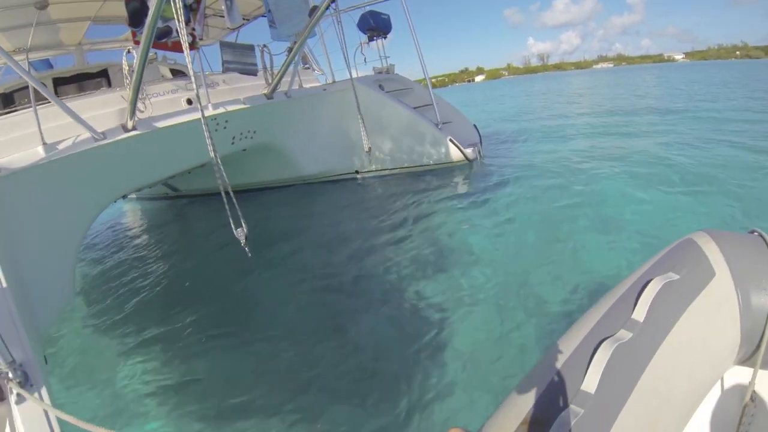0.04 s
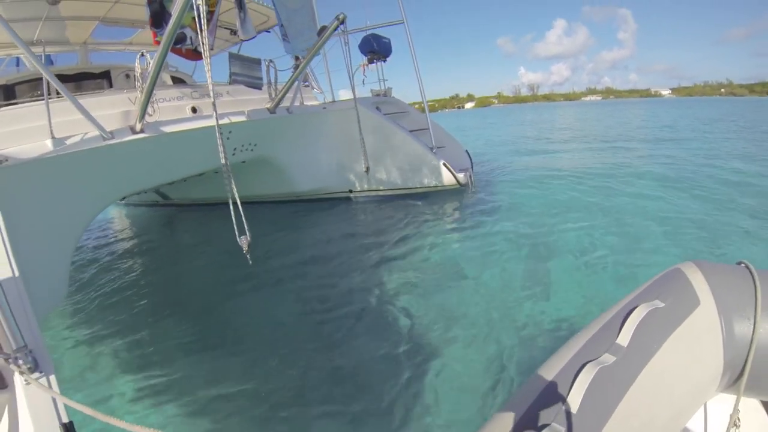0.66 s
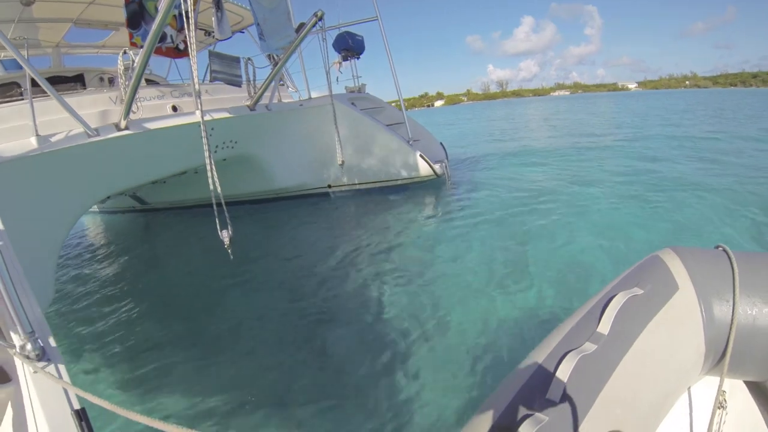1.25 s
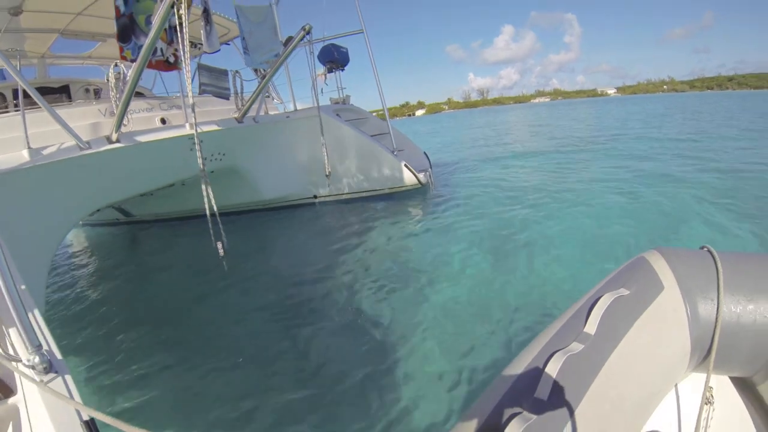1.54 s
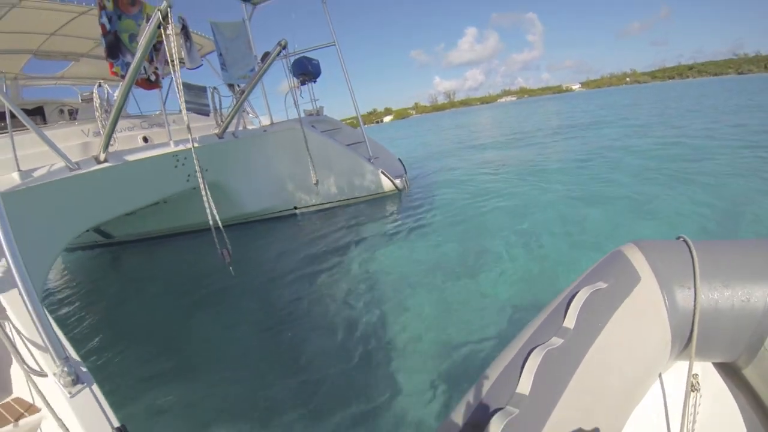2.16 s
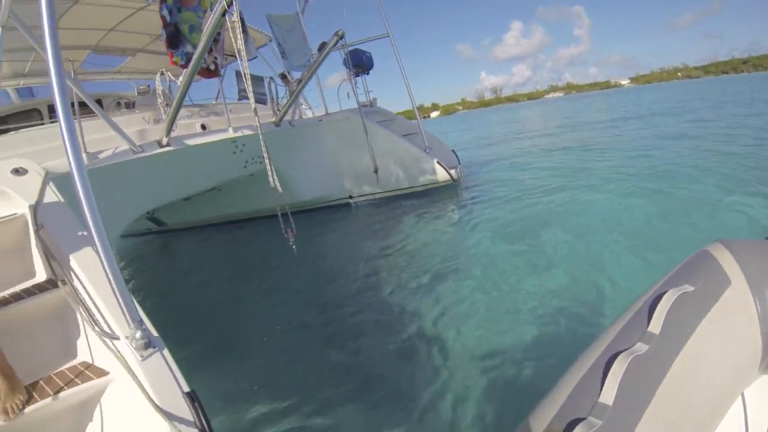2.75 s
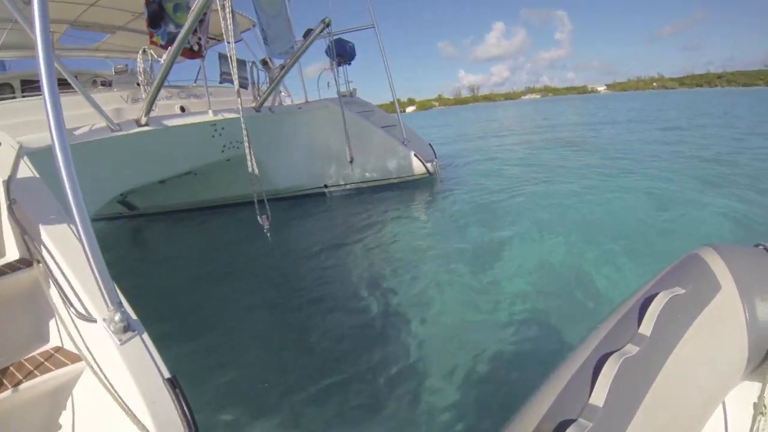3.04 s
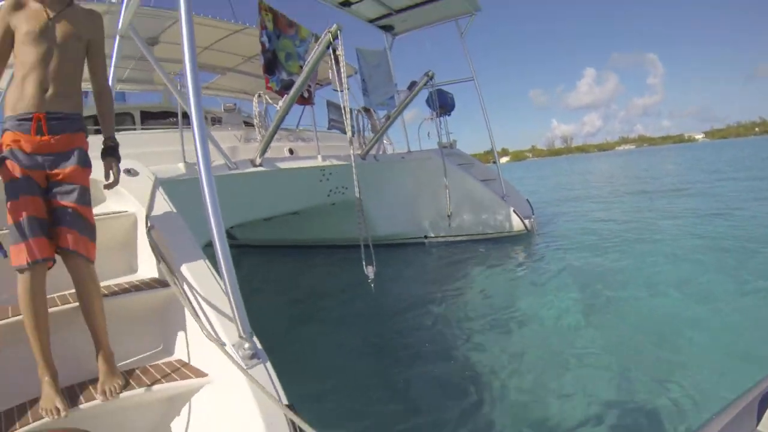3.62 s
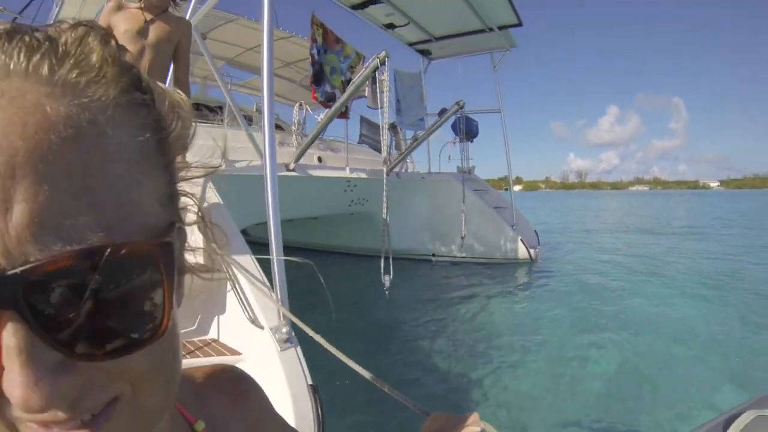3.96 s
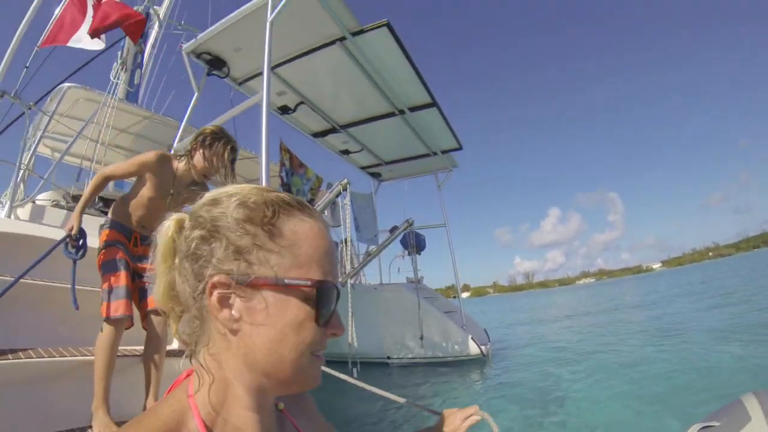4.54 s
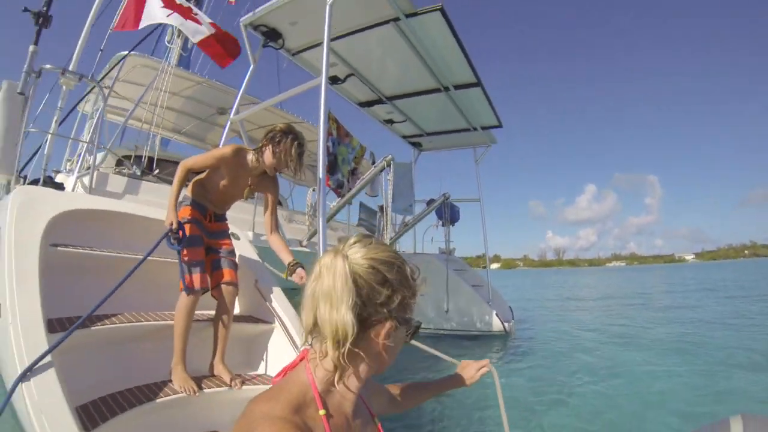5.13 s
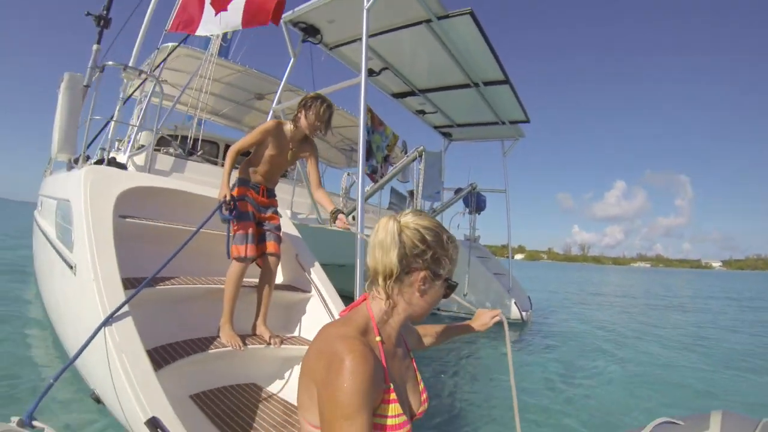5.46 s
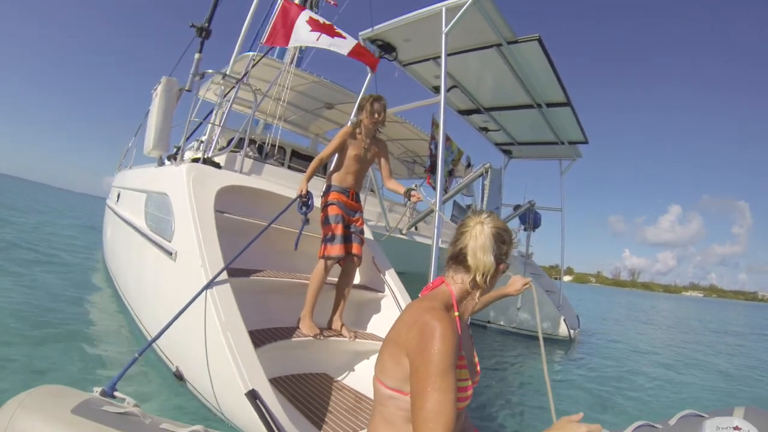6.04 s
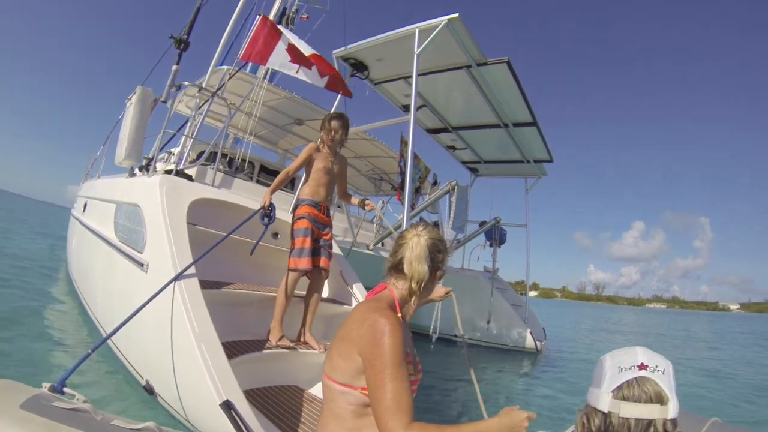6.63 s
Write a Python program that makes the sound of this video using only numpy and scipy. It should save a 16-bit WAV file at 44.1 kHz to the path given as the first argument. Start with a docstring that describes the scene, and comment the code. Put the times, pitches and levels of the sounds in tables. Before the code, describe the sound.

Muffled ripples and low wind rumble around an inflatable dinghy, then heavy knocks and a short scrape as it comes alongside a larger boat.

```python
"""Dinghy at a yacht's stern

An inflatable dinghy lies astern in light wind, heard from a microphone inside a hand-held waterproof
camera housing. Ripples plip, gurgle and boom under the hulls. The housing sways, then is bumped and
scraped as the dinghy comes alongside; its shell muffles everything and rings with its own few modes."""
import sys
import numpy as np
from scipy import signal
from scipy.fft import rfft, irfft
from scipy.io import wavfile
from scipy.ndimage import uniform_filter1d

SR = 44100
rng = np.random.default_rng(int(sys.argv[2]) if len(sys.argv) > 2 else 0)


def materialize(psi):
    """Save the field psi as 16-bit PCM at rate SR to the path in sys.argv[1].

    A 1-D psi becomes a single channel; in a 2-D psi each row is a channel.
    """
    bounded = np.clip(np.atleast_2d(psi).T, -1, 1)
    quanta = np.round(bounded * 32767).astype(np.int16)
    wavfile.write(sys.argv[1], SR, quanta)


N = 303849
T = np.arange(N) / SR


def from_db(db):
    """Decibels to gain."""
    return 10 ** (np.asarray(db) / 20)


def rms_one(x):
    """Scale to rms 1."""
    return x / np.sqrt(np.mean(x ** 2) + 1e-20)


def level(rows):
    """Gain at every sample from (s, dB) rows."""
    return from_db(np.interp(T, *np.transpose(rows)))


def peak(s, rise_db_per_s, fall_db_per_s):
    """Gain that climbs to 1 at time s and falls away again."""
    return from_db(-np.maximum(rise_db_per_s * (s - T), fall_db_per_s * (T - s)))


def add(out, s, sound):
    """Mix a sound in at time s."""
    at = max(round(s * SR), 0)
    out[at:at + len(sound)] += sound[:N - at]


def butter(x, hz, kind, order=2):
    """Causal Butterworth filter."""
    return signal.sosfilt(signal.butter(order, hz, kind, fs=SR, output="sos"), x)


def coloured(x, colour):
    """Shape a signal with a (Hz, dB) curve; rms 1."""
    hz, db = np.transpose(colour)
    bins = np.arange(N // 2 + 1) * SR / N + 1e-3
    gain = from_db(np.interp(np.log(bins), np.log(hz), db))
    return rms_one(irfft(rfft(x) * gain, N))


def drift(per_s):
    """Slow random wander; rms 1."""
    knots = rng.standard_normal(4000)
    return rms_one(np.interp(T * per_s, np.arange(len(knots)), knots))


def resonance(x, hz, width_hz):
    """Two-pole resonance with gain 1 on top."""
    r = np.exp(-np.pi * width_hz / SR)
    feedback = [1, -2 * r * np.cos(2 * np.pi * hz / SR), r * r]
    return signal.lfilter(np.array([1, 0, -1]) * (1 - r * r) / 2, feedback, x + 1e-18)


def noise_tone(hz, width_hz):
    """An unsteady tone: noise passed twice through one resonance; rms 1."""
    band = resonance(rng.standard_normal(N), hz, width_hz)
    return rms_one(resonance(band, hz, width_hz))


def grains(per_s, spread_db):
    """Random clicks of uneven size; rms 1."""
    sizes = from_db(spread_db * np.minimum(rng.exponential(1, N), 4))
    signs = rng.choice([-1, 1], N)
    return rms_one(sizes * signs * (rng.random(N) < per_s / SR))


def swings(rows, steepness, sag):
    """Soft pushes: each swells and dies within a few cycles, its pitch sagging as the load comes off."""
    out, t = np.zeros(N), T[:SR // 2]
    for s, db, hz, swell_s in rows:
        age = t / swell_s
        pitch = hz * (1 - sag * np.tanh(age - 1))
        envelope = (age * np.exp(1 - age)) ** steepness
        add(out, s, from_db(db) * envelope * np.sin(2 * np.pi * np.cumsum(pitch) / SR))
    return out


# Ripples all around the boats, livelier near the stern. Each row: time in seconds, overall gain in dB.
RIPPLE_LEVELS = [(0, -59.3), (1.4, -58.3), (3.2, -61), (3.7, -55.5), (5.1, -54), (6.15, -51.8),
                 (6.89, -53.8)]
# The water as heard from inside the housing. Each row: frequency in Hz, relative level in dB.
WATER_SPECTRUM = [(450, -17), (700, -6), (930, -16), (1080, -7), (1270, 2.5), (1420, -3.5), (1600, -2.5),
                  (1800, -16), (2200, -13), (2500, -16.5), (2950, -13), (3500, -25), (4800, -25.5),
                  (8000, -42.5)]


def ripples(fizz_db=-4.5, wash_db=-5.0, ring_cycles=14):
    """A wash of wavelets with tiny bubbles in it, each ringing briefly at a pitch of its own."""
    wash = rng.standard_normal(N) * from_db(2.8 * drift(12))
    wash = from_db(wash_db) * coloured(wash, WATER_SPECTRUM)
    pitches = np.geomspace(1000, 6500, num=22)
    bubbles = sum(resonance(grains(per_s=30, spread_db=3.0), hz, hz / ring_cycles) for hz in pitches)
    flicker = from_db(4 * np.tanh(drift(22)))
    fizz = from_db(fizz_db) * coloured(bubbles * flicker, WATER_SPECTRUM)
    return level(RIPPLE_LEVELS) * (wash + fizz)


def gurgles(gurgle_db=-65, per_s=45):
    """Larger pockets of air gulp under the stern, the big ones loudest."""
    pitches = np.geomspace(205, 600, num=5)
    pockets = sum(resonance(grains(per_s, spread_db=2.0), hz, hz / 7) / hz ** 0.7 for hz in pitches)
    return from_db(gurgle_db) * rms_one(pockets) * from_db(2.0 * drift(5.4))


# Water swashing down between the hulls. Each row: time in seconds, level of the upper mode in dB.
SWASH_LEVELS = [(0, -55.5), (3.8, -53.5), (5.0, -54), (5.6, -60)]


def swash(hollow_hz=104, deep_hz=62, deep_db=-2.5, width_hz=65, surge_db=2.0):
    """Moving water keeps the air under the hulls droning in two broad modes, surging wave by wave."""
    drone = noise_tone(hollow_hz, width_hz) + from_db(deep_db) * noise_tone(deep_hz, width_hz)
    surge = rms_one(from_db(surge_db * drift(7)))
    return level(SWASH_LEVELS) * surge * drone


# Larger wavelets slapping in under the hollow hulls.
# Each row: start in seconds, peak level in dB, swell time in seconds.
HULL_SLAPS = [(0.0, -34.5, 0.029), (.075, -40.5, .028), (.425, -36, .024), (.86, -38, .02),
              (.91, -37, .025), (1.365, -39.5, 0.032), (1.625, -34, 0.036), (1.842, -29.5, .024),
              (2.32, -40, 0.027), (2.915, -35, .022), (3.0, -36, .03), (3.228, -32, 0.018),
              (3.535, -34.5, .02), (3.692, -23.5, .016), (3.735, -27, .018), (3.85, -27, .018),
              (4.01, -30.5, .01)]


def booms(hollow_hz=103, typical_db=-35, drop_hz_per_db=1.0):
    """Every slap sounds the same hollow, a little lower when it is stronger."""
    slaps = [(s, db, hollow_hz - drop_hz_per_db * (db - typical_db), swell_s)
             for s, db, swell_s in HULL_SLAPS]
    return swings(slaps, steepness=2.1, sag=0.037)


# Wind and handling, right on the housing. Each row: frequency in Hz, relative level in dB.
SWAY_SPECTRUM = [(8, -6), (16, 0), (25, -7.5), (40, -12), (62, -26.5), (120, -41), (250, -47), (600, -91.5)]


def sway(calm_db=-45, surge_db=-24, contact_s=4.88):
    """Wind and hand movement press on the housing: a rumble that builds to the contact and ebbs."""
    rumble = coloured(rng.standard_normal(N), SWAY_SPECTRUM)
    running_rms = np.sqrt(uniform_filter1d(rumble ** 2, size=11000))
    surge = from_db(surge_db) * peak(contact_s, rise_db_per_s=9, fall_db_per_s=10.5)
    return (from_db(calm_db) + surge) * rumble / running_rms


# A faint hum, far off. Each row: pitch in Hz, top level in dB, time of the top in seconds,
# fade on either side in dB per second.
HUM_TONES = [(382, -63.5, 1.9, 1.3), (984, -67.8, 3.0, 1.0)]


def far_hum(width_hz=40):
    """Two narrow, unsteady tones, each swelling once."""
    return sum(noise_tone(hz, width_hz) * from_db(db) * peak(s, fade, fade)
               for hz, db, s, fade in HUM_TONES)


# Open air over the water, dulled by the housing. Each row: frequency in Hz, relative level in dB.
AIR_SPECTRUM = [(40, 5), (110, 6), (160, -5), (205, 0), (300, -5.5), (380, -3.5), (440, -10), (800, -12),
                (2000, -16.5), (4000, -24.5), (7000, -27), (9700, -31), (12000, -32), (15000, -41.5)]


def open_air(db=-56.5):
    """A steady bed of dull air and hiss."""
    return from_db(db) * coloured(rng.standard_normal(N), AIR_SPECTRUM)


def camera_whine(db=-77.5, hz=10320, frames_per_s=23.976):
    """The electronics beside the microphone chirp faintly on seven frames out of eight."""
    frame = T * frames_per_s - .65
    busy = (frame % 1 < .4) & (np.floor(frame) % 8 != 2)
    return from_db(db) * noise_tone(hz, width_hz=450) * busy


# The splashes nearest the microphone.
# Each row: start in seconds, level in dB, ring pitch in Hz, spray decay time in seconds.
NEAR_SPLASHES = [(.132, -54, 4740, .002), (0.302, -37, 1300, .003), (.303, -46, 2680, .003),
                 (.323, -47, 2470, .005), (0.367, -40, 1250, .006), (.454, -39.5, 1300, 0.0033),
                 (.666, -44.5, 1260, .005), (1.316, -47, 2330, .004), (1.3335, -30.5, 1310, 0.0034),
                 (1.362, -43, 1240, .02), (2.168, -41.5, 1380, .007), (2.236, -41.5, 1460, .003),
                 (2.308, -39, 1190, .004), (2.425, -44, 1250, .01), (2.472, -46, 560, .002),
                 (2.873, -35, 1320, 0.0018), (2.901, -38, 1430, .003), (2.908, -33.5, 1285, .004),
                 (3.402, -43, 1230, .012), (3.433, -41.5, 1270, 0.0036), (3.695, -38, 1310, .02),
                 (4.681, -42, 1520, .006), (5.081, -49, 3440, .002), (5.125, -38, 1350, .003),
                 (5.871, -39.5, 1390, .004), (5.976, -45, 2800, .003), (6.102, -37.5, 1300, 0.0036),
                 (6.135, -37, 1340, .002), (6.222, -35.5, 1240, 0.0072), (6.423, -39, 1290, .003),
                 (6.545, -40.5, 1390, .003)]


def plips(width_hz=80, attack_s=0.0003, spray_db=-14):
    """Each splash briefly rings the housing, with a puff of spray."""
    out, t = np.zeros(N), T[:SR // 12]
    envelope = np.exp(-np.pi * width_hz * t) * (1 - np.exp(-t / attack_s))
    for s, db, hz, spray_s in NEAR_SPLASHES:
        ring = np.sin(2 * np.pi * hz * t) * envelope
        hiss = butter(rng.standard_normal(len(t)), [1100, 3100], "band", order=5)
        spray = rms_one(hiss) * np.exp(-t / spray_s)
        add(out, s, from_db(db) * (ring + from_db(spray_db) * spray))
    return out


# Heavy jolts, passed from the hull straight to the microphone.
# Each row: start in seconds, peak level in dB, pitch at the peak in Hz.
HULL_JOLTS = [(2.525, -20, 22), (3.54, -24, 55), (3.694, -31, 160), (4.5, -3.5, 69.5), (4.505, -2.2, 19.3),
              (4.598, -9.5, 30), (4.637, -17.5, 88), (4.752, -18, 68), (4.772, -19, 140), (4.856, -4, 57.4),
              (4.87, -11.5, 116), (4.98, -7, 33), (4.987, -10.5, 66), (5.085, -16, 42), (5.145, -17, 92),
              (5.188, -7, 90)]


def jolts(base_swell_s=.006, swell_cycles=.55):
    """The hull shoves the housing; the lower a jolt, the slower it swells."""
    shoves = [(s, db, hz, base_swell_s + swell_cycles / hz) for s, db, hz in HULL_JOLTS]
    return swings(shoves, steepness=3.6, sag=0.22)


# Modes of the shell around the microphone. Each row: frequency in Hz, width in Hz, gain in dB.
SHELL_MODES = [(311.4, 79, 3), (490, 230, -10.5), (635, 35, 1), (686, 43, 6), (830, 320, -11),
               (1248, 63, 6.5), (1326, 99, -6.5), (1580, 39, -13), (2230, 42, -9), (2090, 77, -14.5),
               (2580, 27, -21), (3050, 130, -39.5), (3600, 370, -19.5), (3900, 420, -18), (4200, 170, -12)]


def housing(force):
    """The shell rings with all its modes at once."""
    return sum(from_db(db) * resonance(force, hz, width_hz) for hz, width_hz, db in SHELL_MODES)


# Blows on the housing itself as the dinghy comes alongside. Each row: start in seconds,
# peak level in dB, hardness as a low-pass cutoff in Hz, crunch decay time in seconds.
HOUSING_BLOWS = [(3.685, -41, 230, .025), (3.696, -32.5, 260, .025), (4.495, -29.5, 260, .004),
                 (4.508, -26, 1150, .004), (4.5185, -24.5, 2400, .007), (4.643, -35, 500, .004),
                 (4.749, -24, 750, .0032), (4.782, -19.5, 1300, .004), (4.805, -31, 400, .03),
                 (4.845, -32, 400, .009), (4.856, -18.5, 750, .018), (4.953, -29.5, 800, .012),
                 (5.141, -29, 250, .011), (5.178, -14.5, 410, .005), (5.271, -30, 220, .003),
                 (5.359, -36, 600, .0027), (5.436, -39, 280, .002), (6.558, -39, 910, .0032)]


def knocks(crunch_gain=0.11, flex_db=-20):
    """A blow and its crunch of small contacts; soft blows flex the wall and reach only the low modes."""
    out, t = np.zeros(N), T[:SR // 6]
    impulse = t == 0
    for s, db, hardness_hz, crunch_s in HOUSING_BLOWS:
        crunch = crunch_gain * rng.standard_normal(len(t)) * np.exp(-t / crunch_s)
        force = butter(impulse + crunch, hardness_hz, "low", order=3)
        ring = housing(force) + from_db(flex_db) * butter(force, [170, 520], "band")
        add(out, s, from_db(db) * ring / np.abs(ring).max())
    return out


# A surface rubbing on the shell, right at the microphone. Each row: frequency in Hz, relative level in dB.
RUB_SPECTRUM = [(200, -12), (450, -6), (740, .5), (1250, -1.5), (1600, .5), (1850, -5), (2120, 3),
                (2400, -5.5), (2900, -6), (3500, -1.5), (7000, -3)]


def scrape(start_s=4.873, end_s=5.016, slip_s=.014, grab_db=-31, strain_db=-29, rasp_db=-26.5):
    """Stick-slip catches drive the dragging shell: it grabs, eases, strains, slips free, stops dead."""
    catches = coloured(grains(per_s=3000, spread_db=2.0), RUB_SPECTRUM)
    grab = from_db(grab_db) * peak(start_s, rise_db_per_s=0, fall_db_per_s=270)
    strain = from_db(strain_db) * peak(end_s - slip_s, rise_db_per_s=235, fall_db_per_s=450)
    judder = from_db(1.2 * drift(250))
    touching = (T > start_s) & (T < end_s)
    drag = catches * (grab + strain) * judder * touching
    ring = butter(housing(drag), 3910, "low", order=14) / np.std(housing(catches))
    rasp = butter(drag, [5300, 7600], "band", order=4)  # the little that gets in above the top mode
    return ring + from_db(rasp_db) * rasp


def scene():
    """Water, wind and bumps, all at the one microphone in the housing."""
    water = ripples() + plips() + gurgles() + swash() + booms()
    bumps = jolts() + knocks() + scrape()
    return (water + bumps + sway() + far_hum() + open_air() + camera_whine())[None]


def record(dry):
    """The top is cut steeply."""
    cutoff_hz = 15100
    return signal.sosfilt(signal.ellip(10, .1, 80, cutoff_hz, fs=SR, output="sos"), dry)


dry = scene()
out = record(dry)
materialize(out)
```